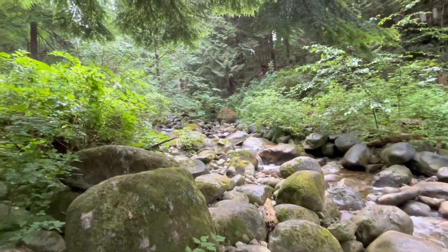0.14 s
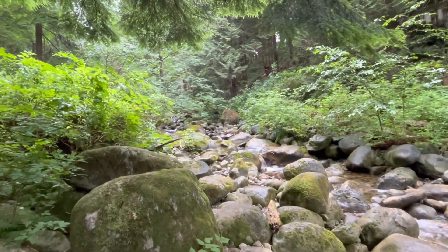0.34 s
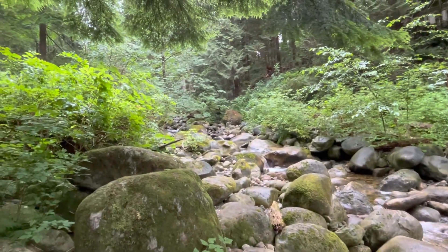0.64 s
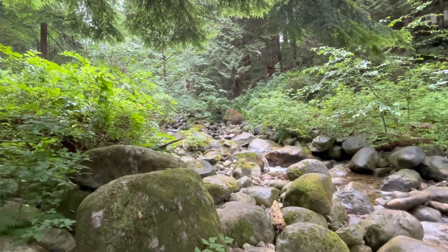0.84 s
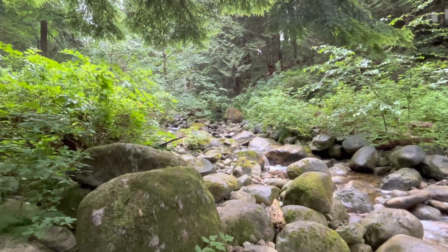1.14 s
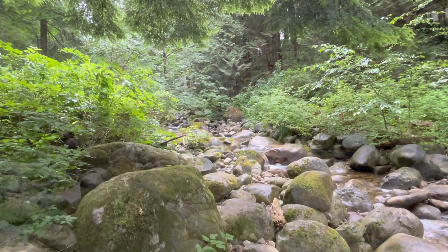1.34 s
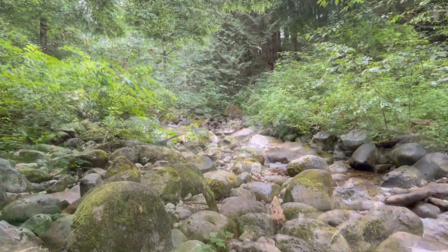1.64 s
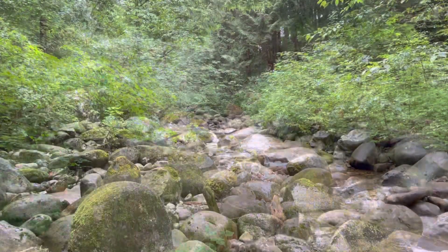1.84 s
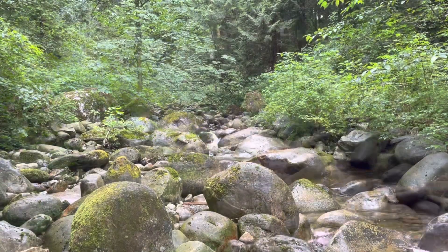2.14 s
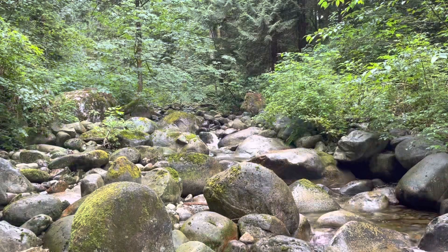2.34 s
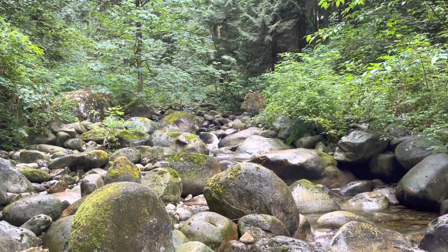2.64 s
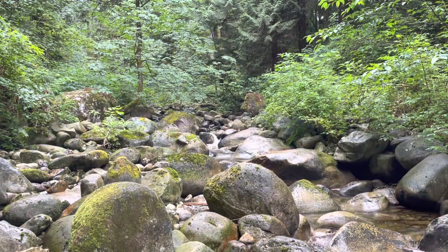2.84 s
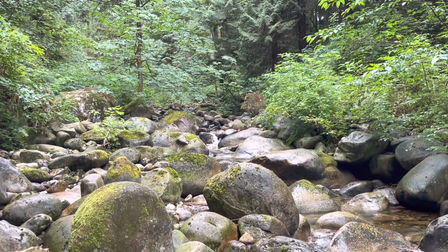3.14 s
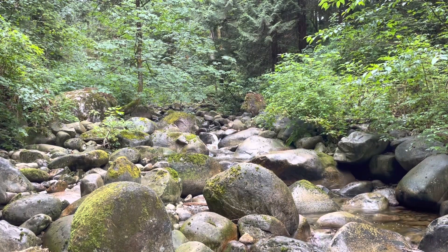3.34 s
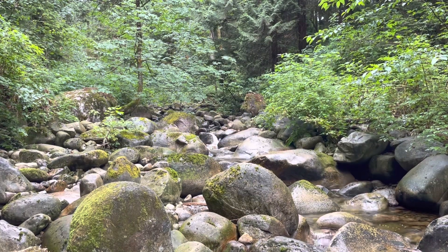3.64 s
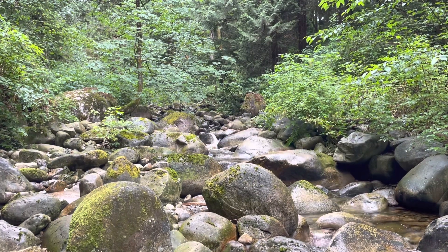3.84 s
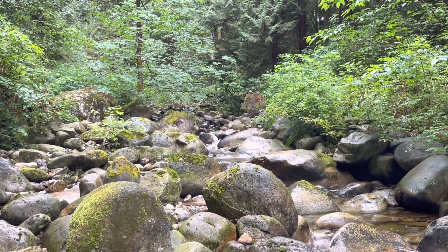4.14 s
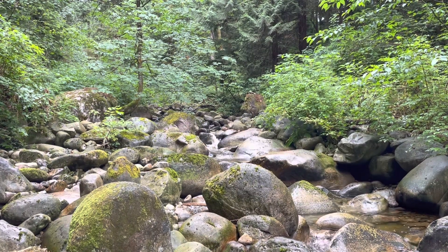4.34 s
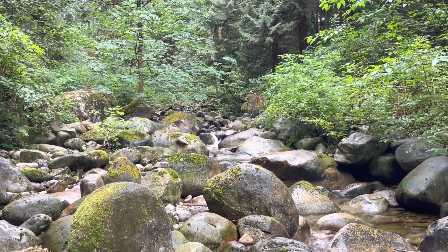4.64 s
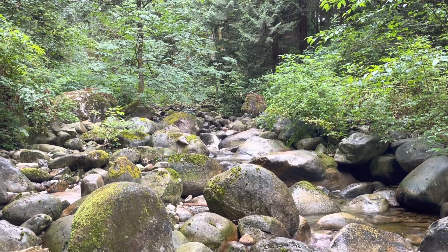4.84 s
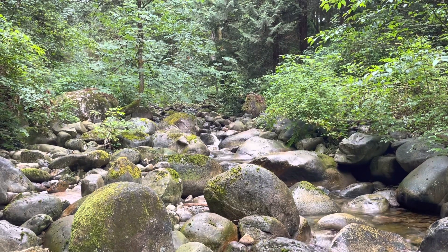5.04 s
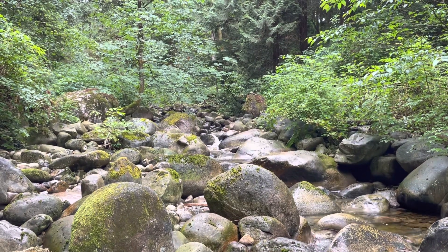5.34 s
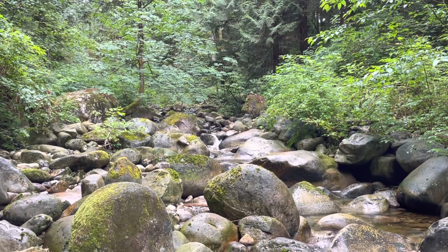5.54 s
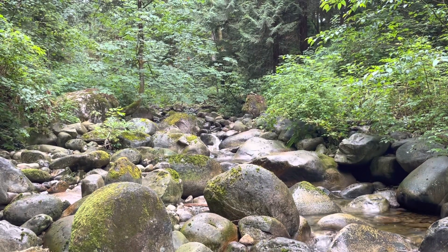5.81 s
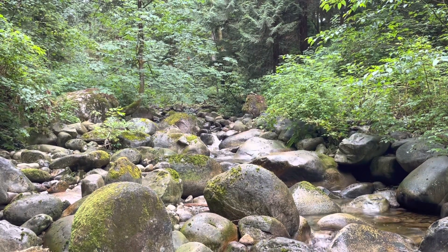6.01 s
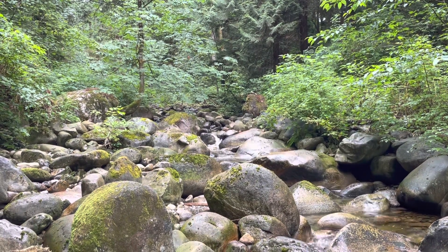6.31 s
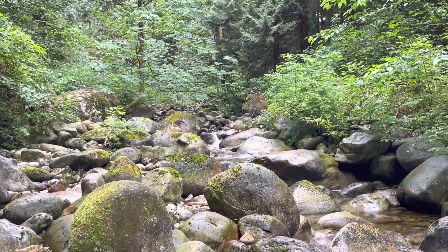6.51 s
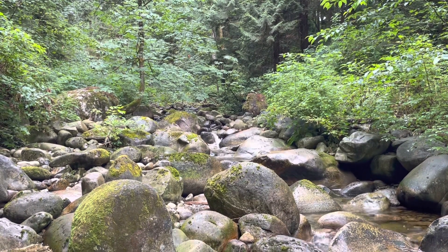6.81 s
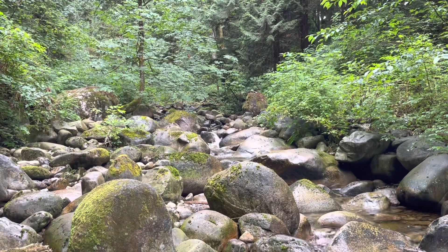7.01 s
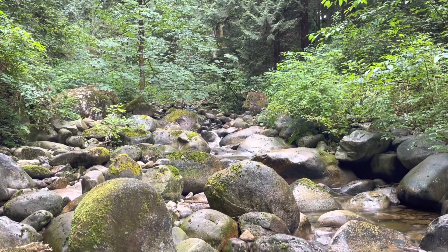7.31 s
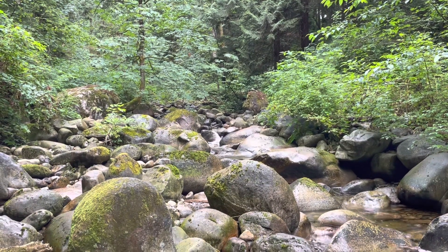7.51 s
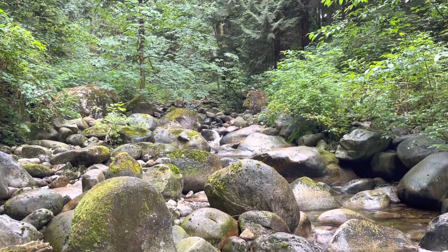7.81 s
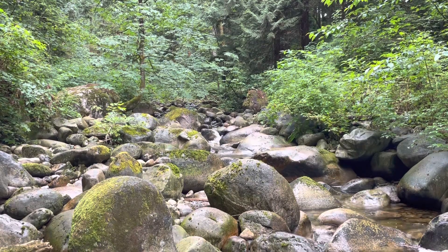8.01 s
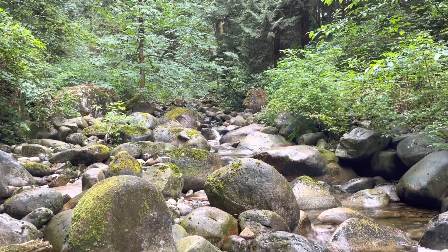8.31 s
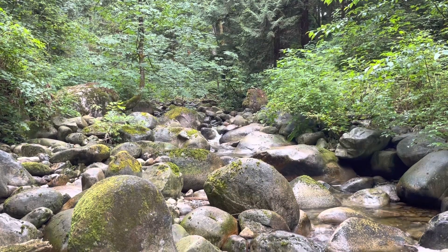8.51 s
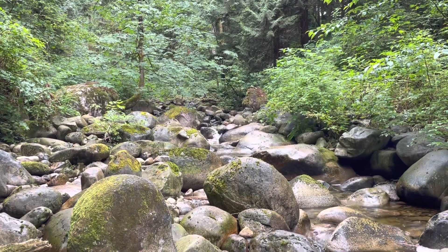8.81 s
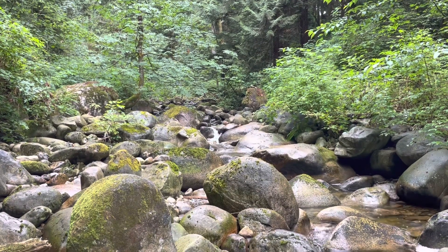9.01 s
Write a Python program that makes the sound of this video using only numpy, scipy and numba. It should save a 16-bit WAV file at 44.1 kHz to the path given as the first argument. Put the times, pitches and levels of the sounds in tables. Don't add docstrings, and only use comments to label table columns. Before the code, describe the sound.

Water flows between stones, distant and low at first, then crossfading to a nearer, fuller rush with glugs, plinking bubbles and fizzing spray.

```python
import sys
import numpy as np
from scipy import signal
from scipy.fft import rfft, irfft, next_fast_len
from scipy.io import wavfile
from scipy.ndimage import uniform_filter1d, map_coordinates
from numba import njit

SR = 44100
rng = np.random.default_rng(int(sys.argv[2]) if len(sys.argv) > 2 else 0)


def dump(signal):
    limited = np.clip(np.atleast_2d(signal).T, -1, 1)
    pcm = np.round(limited * 32767).astype(np.int16)
    wavfile.write(sys.argv[1], SR, pcm)


def amplitude_ratio(level_db):
    exponent = np.asarray(level_db, float) / 20
    return 10 ** exponent


N = 403956


def unit(x):
    return x / np.sqrt(np.mean(x ** 2) + 1e-20)


def curves(rows, at):
    places, *columns = np.transpose(rows)
    return [np.interp(at, places, column) for column in columns]


def on_log_hz(rows, hz):
    return curves([(np.log(f), *rest) for f, *rest in rows], np.log(hz + 1))


def wobble(rate_hz):
    knots = rng.standard_normal(N // 400 + 4)
    return map_coordinates(knots, [np.arange(N) * min(rate_hz, 100) / SR])


# start_s, near_share [0-1]
DISSOLVE = [
    (0, 0.06),
    (1.45, 0.06),
    (1.75, 0.29),
    (2.1, 0.67),
    (9.16, 0.98),
]


def shares():
    angle = np.clip(curves(DISSOLVE, np.arange(N) / SR)[0], 0, 1) * np.pi / 2
    return np.cos(angle), np.sin(angle)


# pitch_hz, left_right_db, likeness [0-1], right_lead_rad
FAR_PORTS = [(60, 0, .93, .15), (300, -1, .88, .75), (520, -1.5, .75, 1.5), (850, -4, .77, 1.6),
             (1400, 0, .55, 1.8), (2600, 0, .5, 3.4), (3600, 2, .45, 6.7), (5400, 1, .6, 9.6),
             (7000, 1, .35, 13.6), (9400, -7, .35, 16), (11100, -1, .9, 18.8), (12900, 0, .9, 18.9),
             (14100, 0, .9, 21.9), (15600, 0, .92, 22)]
NEAR_PORTS = [(60, -.3, .97, .1), (330, -1.5, .95, .4), (900, -2.3, .78, .45), (1850, .5, .7, 1.55),
              (2600, 3.5, .3, 1.4), (3600, 3.5, .69, -.4), (5300, 3, .58, -.7), (6200, 1, .72, .3),
              (7650, 0, .94, 3), (8850, 0, .94, 3.25), (10500, .5, .93, 6.05), (12400, 0, .92, 6.5),
              (14000, 0, .89, 9.25), (15600, 0, .89, 9.45)]


def ports(pair, spot, gain=lambda hz: 1):
    m = next_fast_len(N + 8192)
    hz = np.fft.rfftfreq(m, 1 / SR)
    pan_db, alike, lead_rad = on_log_hz(spot, hz)
    turn = np.arccos(alike) / 2
    common, scattered = rfft(pair, m) * [np.cos(turn), np.sin(turn)] * gain(hz)
    tilt = amplitude_ratio(pan_db / 2) * np.exp(-.5j * lead_rad)
    left = (common + scattered) * tilt
    right = (common - scattered) / tilt
    return irfft(np.array([left, right]), m)[:, :N]


def hum():
    hz = 149.4 * (1 + 0.024 * wobble(14))
    phase = 2 * np.pi * np.cumsum(hz) / SR
    note = amplitude_ratio(-46.5 + 1.8 * wobble(12.4)) * np.sin(phase) * shares()[0]
    return ports(np.array([note, 0 * note]), FAR_PORTS)


# pitch_hz, level_db [per Hz]
FAR = [(30, -17), (60, -8), (150, 3), (220, -1.5), (320, -7.5), (520, -8), (850, -9.5), (1400, -16),
       (2600, -20), (5500, -21), (7500, -26.5), (9400, -25), (13300, -38.5), (15600, -32.5)]
NEAR = [(30, -23), (60, -4.5), (120, 2.5), (340, -4), (540, -5), (900, -7.5), (1700, -7.5), (2500, -15),
        (3600, -13.5), (5400, -18.5), (7000, -16.5), (10000, -21.5), (13600, -28.5), (15600, -21)]
# centre_hz, width_hz, level_db
FAR_HOLLOWS = [
    (85.6, 9.1, 8),
    (112, 14, -2),
    (162, 9.5, 6.5),
    (249, 27, -4.5),
    (316, 50, 3.5),
]
NEAR_HOLLOWS = [
    (160, 63, 1.5),
    (235, 16, -3),
    (359, 44, 2.5),
]


def colour(spectrum, hollows, hz):
    bumps_db = sum(db * np.exp(-((hz - centre) / width) ** 2) for centre, width, db in hollows)
    return amplitude_ratio(on_log_hz(spectrum, hz)[0] + bumps_db)


def layer(pair, band, far_db):
    far, near = shares()
    a = ports(pair, FAR_PORTS, lambda hz: band(hz) * colour(FAR, FAR_HOLLOWS, hz))
    b = ports(pair[:, ::-1], NEAR_PORTS, lambda hz: band(hz) * colour(NEAR, NEAR_HOLLOWS, hz))
    return far * amplitude_ratio(far_db) * unit(a) + near * unit(b)


def low(hz):
    return 1 / np.sqrt(1 + (hz / 600) ** 6)


def high(hz):
    return 1 / np.sqrt(1 + (2500 / (hz + 1)) ** 6)


def middle(hz):
    return np.sqrt(np.abs(1 - low(hz) ** 2 - high(hz) ** 2))


def turbulence(patchy_db):
    z = signal.stft(rng.standard_normal((2, N)), nperseg=256)[2]
    field = uniform_filter1d(rng.standard_normal(z.shape[1:]), size=9, axis=0)
    field = uniform_filter1d(field, size=8, axis=1)
    return unit(signal.istft(z * amplitude_ratio(patchy_db * unit(field)), nperseg=256)[1][:, :N])


@njit
def add(out, start, hz, size, cycles, rise, sr):
    for s, f, g, k in zip(start, hz, size, cycles):
        for i in range(min(int(3 * k * sr / f), len(out) - s)):
            u = i * f / (k * sr)
            out[s + i] += g * 8 * u * np.exp(-3 * u) * np.sin(2 * np.pi * k * u * (1 + rise * u / 2))


def swarm(count, lo_hz, hi_hz, cycles, spread_db):
    out = np.zeros((2, N))
    for row in out:
        when, pitch, luck, life = rng.random((count, 4)).T
        hz = lo_hz * (hi_hz / lo_hz) ** pitch
        size = hz * amplitude_ratio(-spread_db * np.log(luck + 0.024))
        add(row, (when * N).astype(np.int64), hz, size, cycles * (0.31 + 2 * life ** 2), .05, SR)
    return unit(out)


def surges(rows, half_s, over_db):
    t = np.arange(N) / SR
    return 1 + sum(amplitude_ratio(db + over_db) * np.exp(-((t - s) / half_s) ** 2) for s, hz, db in rows)


# start_s, flow_over_mean_db
FLOW = [(0, 1.5), (.6, 1.5), (1.4, 0.5), (1.9, -3.5), (1.97, -0.5), (2.4, 0), (2.7, 1), (3.2, 0),
        (3.75, 0.5), (4.1, 0), (4.45, 2.5), (5.2, 0.5), (5.75, 1.5), (6.1, -1), (6.7, -0.5), (7.25, .5),
        (8.6, -1), (9.16, 2)]


def flow_level(near_db, follows):
    return near_db + follows * curves(FLOW, np.arange(N) / SR)[0]


def gurgle(churn):
    bubbles = swarm(count=4000, lo_hz=200.5, hi_hz=988, cycles=5.44, spread_db=2.5)
    water = layer(turbulence(0.26) + amplitude_ratio(-9.5) * bubbles, low, far_db=-6.5)
    gain = amplitude_ratio(flow_level(-31.5, 1.13) + 0.19 * churn + 0.19 * wobble(21))
    return gain * surges(POCKETS + GLUGS, half_s=0.014, over_db=3.2) * water


def rush(churn, swell):
    bubbles = swarm(count=12000, lo_hz=697.0, hi_hz=3613, cycles=9.2, spread_db=3.0)
    water = layer(turbulence(1.92) + amplitude_ratio(-8) * bubbles, middle, far_db=-7.5)
    gain = amplitude_ratio(flow_level(-31, 0.39) + 0.17 * churn + 0.24 * wobble(12))
    return gain * swell * surges(BUBBLES, half_s=0.012, over_db=5.6) * water


# start_s, level_db [peak], pitch_hz [drop]
SPLASHES = [(0.9727, -28, 5000), (1.863, -37, 7560), (2.2453, -27, 6000), (2.4997, -26, 4240),
            (2.658, -22, 7400), (2.999, -22, 7000), (3.3288, -18, 5000), (3.4531, -22, 4490),
            (3.6561, -27, 6000), (3.74, -17, 5350), (3.9689, -26, 4760), (4.0417, -30, 6360),
            (4.3435, -18, 4240), (4.5151, -39, 6000), (5.2335, -28, 6000), (5.607, -25, 5000),
            (5.7399, -35, 6730), (5.7833, -25.5, 5000), (6.118, -26, 6360), (6.4602, -20, 6360),
            (6.6443, -18, 4760), (7.2838, -20, 5550), (7.6655, -24, 6360), (7.7059, -24, 6650),
            (7.7538, -26, 6700), (7.899, -29, 4490), (7.9663, -17, 3370), (8.3714, -20, 4430),
            (8.8418, -27, 5500), (9.1, -23, 5500)]


def spray_bursts():
    gain, t = np.ones(N + SR), np.arange(SR // 10) / SR
    u = t / 0.0049
    for s, db, hz in SPLASHES:
        gain[round(s * SR):][:len(t)] += amplitude_ratio(db + 17.5) * (1 - np.exp(-8 * u)) * np.exp(-u * u)
    return gain[:N]


def spray(churn, swell):
    crackle = swarm(count=6000, lo_hz=3830, hi_hz=17500, cycles=2.8, spread_db=2)
    fine = swarm(count=30000, lo_hz=1984, hi_hz=17040, cycles=20.2, spread_db=4.5)
    water = layer(turbulence(1.04) + amplitude_ratio(-5.5) * fine + amplitude_ratio(-6.5) * crackle, high, far_db=-8)
    gain = amplitude_ratio(flow_level(-35.5, 0.32) + 0.5 * churn + 0.84 * wobble(70))
    return gain * spray_bursts() * swell * water


def creek():
    churn = wobble(22)
    swell = surges([(s, hz, db) for s, db, hz in SPLASHES], half_s=0.045, over_db=3.2)
    return gurgle(churn) + rush(churn, swell) + spray(churn, swell)


def ring(rows, cycles):
    s, hz, db = np.transpose(rows)
    far, near = shares()
    dry = np.zeros((2, N))
    start = np.round((s - 0.477 * cycles / hz) * SR).astype(np.int64)
    start = np.clip(start, 0, N - 1)
    add(dry[0], start, 0.959 * hz, amplitude_ratio(db - 4.5), np.full(len(s), float(cycles)), .08, SR)
    return ports(dry * far, FAR_PORTS) + ports(dry * near, NEAR_PORTS)


def stray_pockets():
    when, pitch, luck = rng.random((220, 3)).T
    when = when * (N - 1) / SR
    far_share = shares()[0][(when * SR).astype(int)]
    level_db = -30 + 6 * (luck - .5) - 6.5 * far_share
    hz = 260 * (3830 / 260) ** pitch
    return ring(np.transpose([when, hz, level_db]), cycles=4.33)


def drops():
    return ring([(s + .006, hz, db - 1.5) for s, db, hz in SPLASHES], cycles=10.25)


# start_s [of the peak], pitch_hz, level_db [peak]
BUBBLES = [(0.22, 1000, -21.5), (0.563, 800, -17.5), (0.606, 1120, -22), (1.952, 890, -21),
           (2.227, 1560, -20), (2.37, 1170, -20), (2.454, 1140, -20), (2.686, 880, -22), (3.306, 1900, -19),
           (3.571, 1080, -24), (3.609, 1740, -18), (3.738, 1610, -16), (5.138, 676, -21.5),
           (5.328, 875, -16.5), (5.462, 1470, -19), (5.733, 1040, -23), (5.803, 1040, -17),
           (5.944, 1470, -23), (6.146, 1140, -19.5), (7.088, 1890, -14.5), (7.273, 530, -15.5),
           (7.4, 1470, -18), (7.653, 1600, -17), (7.78, 800, -22), (8.104, 1590, -15), (8.527, 960, -18),
           (8.626, 1240, -28), (8.863, 1930, -13), (8.986, 950, -20), (9.151, 1470, -14)]


def riffle_bubbles():
    return ring(BUBBLES, cycles=5.47)


# start_s [of the peak], pitch_hz, level_db [peak]
POCKETS = [(0.455, 397, -26), (2.075, 330, -23), (2.194, 398, -21), (2.38, 250, -21), (2.478, 440, -21.5),
           (2.69, 314, -21), (2.725, 396, -17), (3.335, 173, -20.5), (3.987, 146, -22.5),
           (4.328, 302, -18.5), (4.428, 484, -18), (4.516, 285, -19.5), (4.841, 473, -18.5),
           (5.107, 410, -16), (5.329, 235, -18.5), (5.389, 370, -21.5), (5.559, 133, -22),
           (5.583, 434, -13), (5.617, 268, -16), (5.768, 434, -16), (5.793, 480, -21), (5.885, 400, -17.5),
           (6.982, 300, -19), (7.021, 240, -22), (7.1, 387, -20), (7.291, 312, -21), (7.647, 368, -17),
           (8.447, 368, -21.5), (8.866, 395, -17.5), (9.093, 480, -14.5)]
# start_s [of the peak], pitch_hz, level_db [peak]
GLUGS = [(0.283, 694, -22), (0.722, 674, -21), (7.94, 160, -24), (1.63, 290, -26.5), (1.952, 680, -23),
         (2.188, 149, -27.5), (2.287, 312, -25), (2.358, 565, -22), (2.388, 155, -24), (2.697, 175, -22),
         (2.947, 536, -22), (3.332, 710, -16.5), (3.612, 710, -20), (4.717, 142, -31), (4.721, 680, -22),
         (5.282, 290, -19), (5.598, 870, -26), (5.721, 160, -24), (6.001, 200, -20), (6.273, 1230, -25),
         (6.848, 125, -28.5), (7.072, 570, -19), (7.321, 342, -21), (7.41, 520, -23), (7.437, 170, -27),
         (8.02, 260, -20.5), (8.157, 620, -22), (8.09, 163, -22), (8.84, 570, -23), (9.06, 400, -19)]


def air_pockets():
    return ring(POCKETS + GLUGS, cycles=4.33)


def scene():
    return hum() + creek() + stray_pockets() + drops() + riffle_bubbles() + air_pockets()


def low_pass(x):
    return signal.sosfilt(signal.butter(12, 15890, fs=SR, output="sos"), x)


def record(dry):
    return low_pass(dry)


dry = scene()
out = record(dry)
dump(out)
```